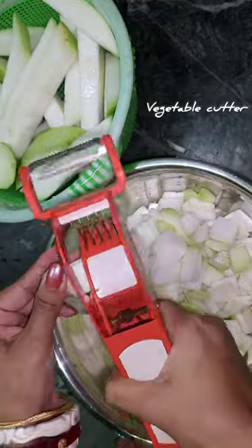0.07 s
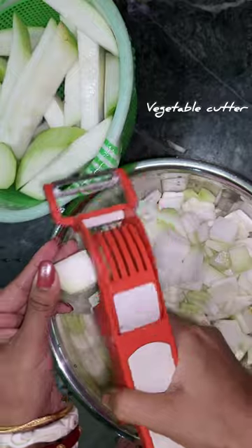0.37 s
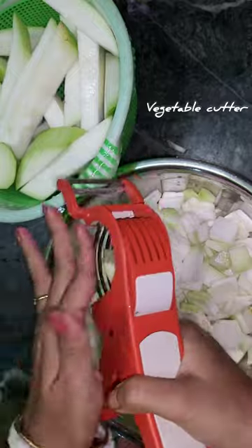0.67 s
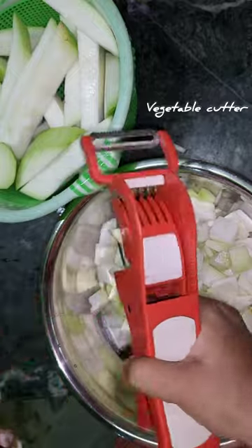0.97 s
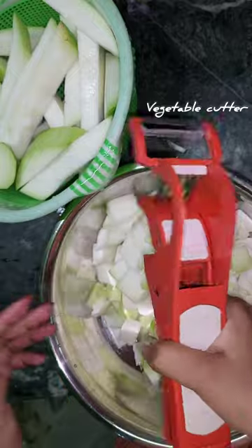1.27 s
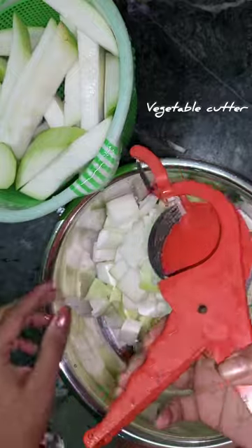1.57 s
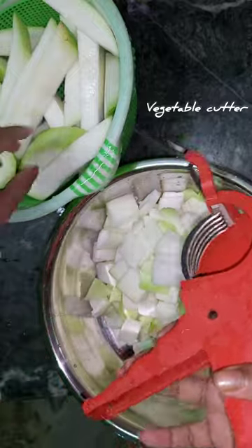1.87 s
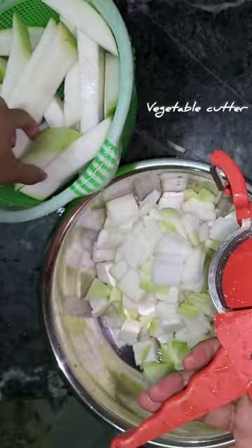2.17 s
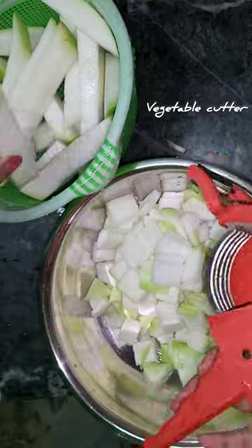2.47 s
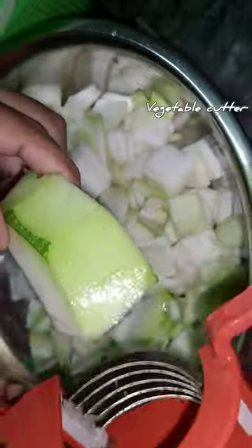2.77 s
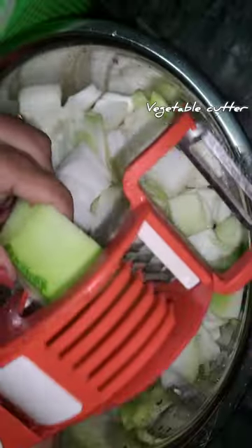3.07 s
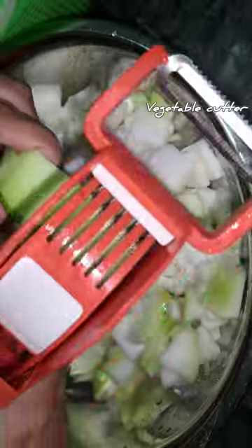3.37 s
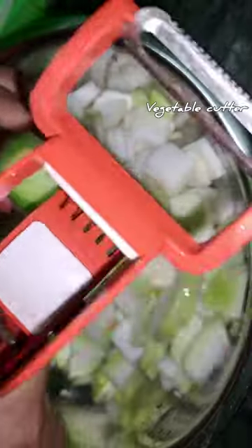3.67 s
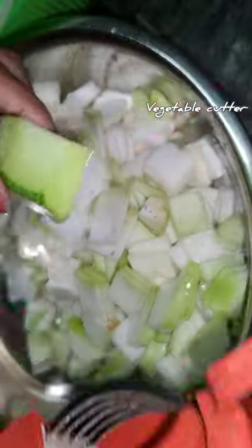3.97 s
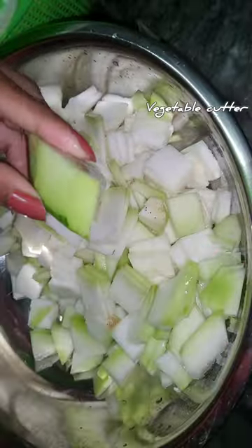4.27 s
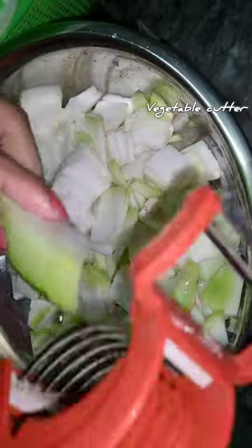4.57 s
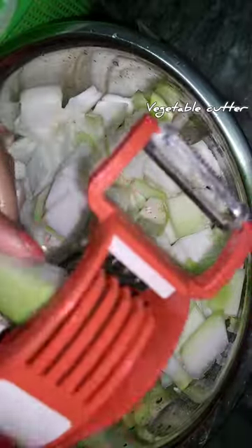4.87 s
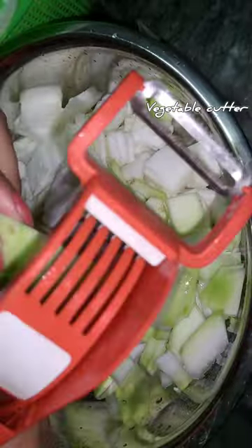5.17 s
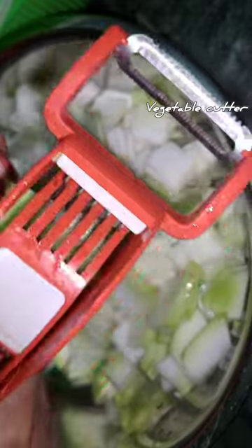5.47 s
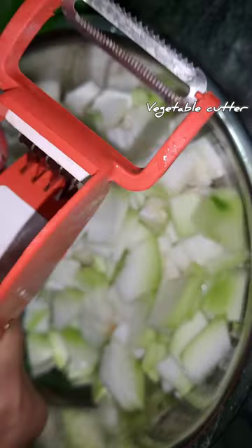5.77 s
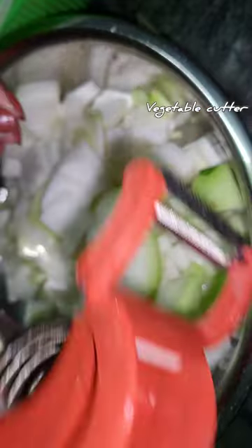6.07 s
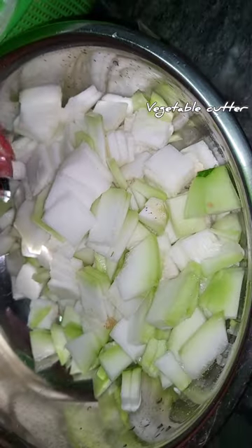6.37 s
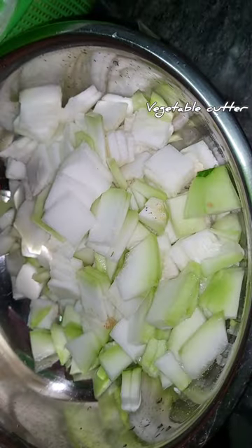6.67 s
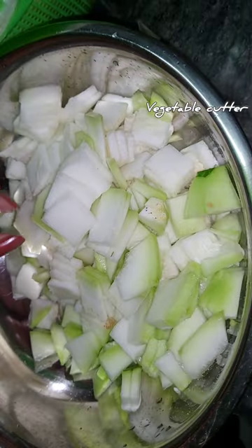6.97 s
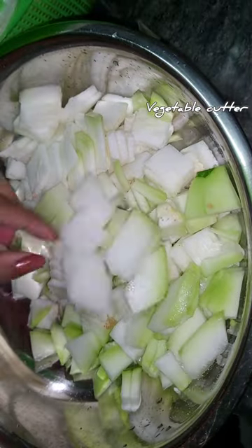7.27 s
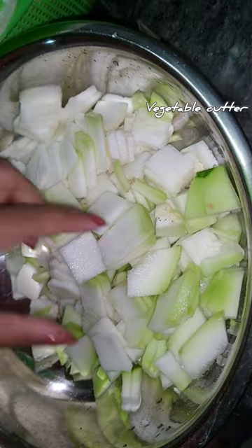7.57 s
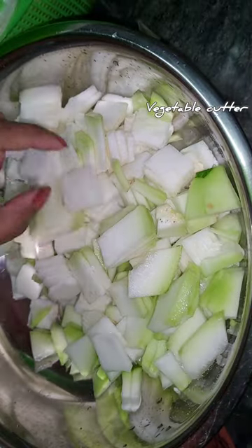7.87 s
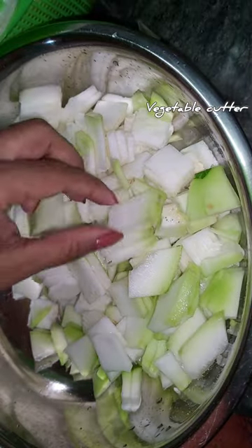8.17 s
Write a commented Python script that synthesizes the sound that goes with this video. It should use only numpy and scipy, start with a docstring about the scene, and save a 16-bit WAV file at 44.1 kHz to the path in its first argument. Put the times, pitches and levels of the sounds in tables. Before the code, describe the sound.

Four sharp plastic snaps of a hand chopper dicing gourd, each after a wet crunch, with bangles clinking between cuts.

```python
"""A sharp plastic snap opens the scene: a scissor-type chopper dices gourd over a steel bowl close by.
Four times the blades load the flesh, it tears in quickening slips, and the handles collide and rebound,
exciting the modes of shell and blades. Between cuts the frame ticks, the bowl is knocked, bangles clink
and fingers stir the pieces. The hard-walled kitchen reverberates, over a low rumble, a far engine
and, near the end, a thin whine."""
import sys
import numpy as np
from scipy import signal
from scipy.fft import rfft, irfft, next_fast_len
from scipy.io import wavfile
from scipy.ndimage import map_coordinates

SR = 44100
rng = np.random.default_rng(int(sys.argv[2]) if len(sys.argv) > 2 else 0)


def unload_wav(signal):
    """Save mono or channel-first audio to the path in sys.argv[1] as 16-bit WAV at rate SR, clipped to [-1, 1]."""
    wavfile.write(
        sys.argv[1],
        SR,
        np.round(np.clip(np.atleast_2d(signal).T, -1, 1) * 32767).astype(np.int16),
    )


N = 370881
TIME = np.arange(N) / SR
AGE = TIME[:SR]  # the first second after an impact

# One squeeze a row: snap t/s, squeeze length/s, pressing level/dB, snap level/dB, treble/dB, room/dB,
# thump level/dB, hollowness (0-1), first rebound delay/s, loss per rebound/dB, shell tuning (ratio),
# blade resonance f/Hz, its boost/dB, lead of the last slip/s, its level/dB
CUTS = [(0.038, .3, -42.5, 10.8, -2.5, -3.5, -21.5, 0.76, 0.0027, 13.4, 1.004, 2650, 3.1, 0.02, -36),
        (1.0521, 0.21, -50, 9.34, -3, 1.5, -12, 0.64, 0.021, 8.6, 1.0, 7800, 5, 0.018, -45.5),
        (3.5611, 0.51, -58, 12.7, 3.5, -1.5, -7, 1, .012, 4.5, .98, 1505, 2.5, .017, -27.5),
        (5.6626, 0.57, -59, 10.64, 2.5, 2.5, -4, 0.4, 0.016, 6.8, 0.95, 3750, 3, 0.019, -31.5)]


def amp(db):
    """Amplitude ratio of a level in decibels."""
    return 10 ** (np.asarray(db) / 20)


def unit(x):
    """Normalise to rms 1."""
    return x / np.sqrt(np.mean(x ** 2) + 1e-20)


def unit_energy(x):
    """Normalise to energy 1 in each channel."""
    return x / np.linalg.norm(x, axis=-1, keepdims=True)


def along(points, hz):
    """Interpolate (f/Hz, value) points on a logarithmic frequency axis."""
    f, values = np.transpose(points)
    return np.interp(np.log(hz + 1), np.log(f + 1), values)


def curve(points):
    """Interpolate (t/s, value) points at every sample."""
    return np.interp(TIME, *np.transpose(points))


def swells(rows):
    """Gaussian envelopes from (centre t/s, half length/s, level/dB) rows."""
    return sum(amp(db) * np.exp(-((TIME - s) / half) ** 2) for s, half, db in rows)


def fade(t, t60):
    """Exponential decay by 60 dB in t60 seconds."""
    return np.exp(-np.log(1000) * t / t60)


def blow(chatter_s, ring_db, ring_t60):
    """Impact envelope: a burst of contact, then the body's free decay."""
    return np.exp(-(AGE / chatter_s) ** 4) + amp(ring_db) * fade(AGE, ring_t60)


def wobble(rate):
    """Smooth random modulation, with rate knots a second."""
    return map_coordinates(rng.standard_normal(int(N * rate / SR) + 4), [TIME * rate])


def add(track, s, sound):
    """Superpose a sound on a track at s seconds."""
    start = max(round(s * SR), 0)
    track[..., start:start + sound.shape[-1]] += sound[..., :N - start]


def peak(hz, centre, width, db):
    """A resonance as a bell-shaped boost in dB."""
    return db / (1 + (2 * (hz - centre) / width) ** 2)


def narrow_band(hz, centre, half_width):
    """Band-pass response in dB, 6 dB down at half_width from the centre."""
    return -20 * np.log10(1 + ((hz - centre) / half_width) ** 2)


def bright(hz, treble_db, hinge_hz=3000):
    """Treble shelf in dB: a harder contact excites more high frequencies."""
    return treble_db * hz ** 4 / (hz ** 4 + hinge_hz ** 4)


def coloured(x, level):
    """Minimum-phase filter with the dB shape level(hz); white noise keeps its power."""
    size = 2 * next_fast_len(x.shape[-1] // 2 + 4096)
    magnitude = unit(amp(level(np.fft.rfftfreq(size, 1 / SR))))
    cepstrum = irfft(np.log(magnitude))
    cepstrum[1:size // 2] *= 2  # folding the cepstrum makes the filter causal
    cepstrum[size // 2 + 1:] = 0
    return irfft(rfft(x, size) * np.exp(rfft(cepstrum)))[..., :x.shape[-1]]


def noise_pair(correlation, size):
    """Partially coherent white noise in two channels."""
    mid, side = rng.standard_normal((2, size))
    angle = np.arccos(np.clip(correlation, -1, 1)) / 2
    return np.cos(angle) * mid + np.sin(angle) * np.array([side, -side])


def crackle(rate, grain_db):
    """Shot noise: tiny ruptures, rate a second on average, on a wet hiss."""
    grains = (rng.random(N) < rate / SR) * rng.standard_normal((2, N))
    return unit(noise_pair(0.11, N) + amp(grain_db) * unit(grains))


def ringing(modes, split=.0015, twin_db=-11):
    """Free vibration: damped (f/Hz, level/dB, t60/s) modes, each split into a beating pair."""
    out = np.zeros((2, SR))
    for hz, db, t60 in modes:
        phase = 2 * np.pi * hz * AGE
        offset = 2 * np.pi * rng.random((2, 2, 1))
        twins = np.sin(phase + offset[0]) + amp(twin_db) * np.sin(phase * (1 + split) + offset[1])
        decay = fade(AGE, t60)
        out += amp(db) * np.linalg.norm(decay) * unit_energy(twins * decay)
    return out


def scattered(modes, t60, scatter_db=3.0):
    """Modal excitation: every blow shares its energy among the modes differently."""
    return [(hz, db + scatter_db * rng.standard_normal(), t60) for hz, db in modes]


def kitchen(build_s=0.0016):
    """A diffuse impulse response: reflections build up, then the treble dies first."""
    # Reverberation time: f/Hz, t60/s
    decay_times = [(200, 0.96), (530, 0.49), (1390, 0.6), (7000, 0.48), (10000, 0.42)]
    hz, t, spectra = signal.stft(noise_pair(0.1, SR), SR, nperseg=256)
    decay = fade(t, along(decay_times, hz)[:, None])
    tail = signal.istft(spectra * decay, SR, nperseg=256)[1][:, :SR]
    return unit_energy(tail * (1 - np.exp(-(AGE / build_s) ** 2)))


def in_room(x, room_db):
    """Direct sound plus reverberation, by convolution with the kitchen's response."""
    return x + amp(room_db) * signal.fftconvolve(x, kitchen(), axes=1)[:, :x.shape[1]]


def room_noise(rumble_db=3, hum_db=-1.0, hum_hz=143, pan_db=-3):
    """Ambient noise: rumble and a narrow-band hum, a little to the right, under a faint hiss."""
    # Common envelope of rumble and hum: t/s, level/dB
    low_levels = [(0.0, -54.5), (0.47, -61), (1.22, -54), (1.57, -61), (2.2, -60), (2.56, -58),
                  (2.58, -66.5), (3.68, -57), (4.05, -66.5), (4.8, -64), (5.74, -55), (5.99, -64.5),
                  (6.44, -67.5), (7.82, -57.5), (8.41, -59.5)]
    # Rumble spectrum: f/Hz, level/dB
    rumble_spectrum = [(15, -48), (30, -22.5), (55, 0), (85, -10), (115, -5.5), (190, -10), (280, -6.5),
                       (480, -15), (840, -19.5), (1400, -27), (1900, -25.5), (2300, -38.5), (4000, -45.5),
                       (16000, -48.5)]
    # Stereo width of the rumble: f/Hz, relative side level/dB
    side_spectrum = [(60, -10), (130, -11.5), (300, -7.5), (1400, -0.5)]
    # Hiss envelope: t/s, level/dB
    hiss_levels = [(2.55, -72), (2.6, -77), (6.5, -79), (8.4, -72.5)]
    # Hiss spectrum: f/Hz, level/dB
    hiss_spectrum = [(2200, -23), (2850, 3), (3400, -16), (5300, -9), (6300, 2.5), (7300, 6), (8300, -16),
                     (16000, -18)]
    mid, side = rng.standard_normal((2, N))
    side = coloured(side, lambda hz: along(side_spectrum, hz))
    rumble = unit(coloured(np.array([mid + side, mid - side]), lambda hz: along(rumble_spectrum, hz)))
    hum = unit(coloured(rng.standard_normal(N), lambda hz: narrow_band(hz, hum_hz, half_width=6)))
    low = amp(curve(low_levels)) * (amp(rumble_db) * rumble + amp(hum_db) * hum)
    hiss_gain = amp(curve(hiss_levels) + 0.93 * wobble(2.3))
    hiss = hiss_gain * coloured(noise_pair(0.14, N), lambda hz: along(hiss_spectrum, hz))
    return amp([[pan_db / 2], [-pan_db / 2]]) * low + hiss


def whine(pitch_hz=1700.0, waver_hz=.38, octave_below_db=-11):
    """A thin electric tone with slight frequency modulation and a faint subharmonic."""
    # Whine envelope: t/s, level/dB
    levels = [(6.9, -71), (7.7, -63), (8.4, -61.5)]
    phase = 2 * np.pi * np.cumsum(pitch_hz + waver_hz * wobble(7.4)) / SR
    return amp(curve(levels)) * (np.sin(phase) + amp(octave_below_db) * np.sin(phase / 2))


def engine(idle_hz=58, pull_s=0.94, rise_hz_per_s=18, stop_s=2.57, db=-62, gain_db_per_s=2):
    """Engine orders follow shaft speed: a far engine idles, speeds up and grows louder; its sound ends abruptly
    at 2.57 s."""
    hz = idle_hz + rise_hz_per_s * np.maximum(TIME - pull_s, 0) + 0.32 * wobble(9.9)
    phase = 2 * np.pi * np.cumsum(hz) / SR
    orders = np.sin(phase) + amp(-7) * np.sin(1.5 * phase) + amp(-3) * np.sin(2 * phase)
    running = np.clip((stop_s - TIME) / 0.014, 0, 1)
    return amp(db + gain_db_per_s * TIME + 1.5 * wobble(8.2)) * running * orders


def handling():
    """Structure-borne noise: dull bumps as the chopper shifts in the grip."""
    # Changes of hold: centre t/s, half length/s, level/dB
    bumps = [(.75, 0.053, -61), (.97, .05, -53.5), (1.2, 0.074, -50.5), (2.47, 0.071, -59)]
    # Bump spectrum: f/Hz, level/dB
    spectrum = [(25, -10), (65, 3), (120, 1.5), (180, -8), (280, -5), (2000, -50.5)]
    return swells(bumps) * coloured(noise_pair(0.88, N), lambda hz: along(spectrum, hz))


def stirring():
    """Sliding friction: fingers push the wet pieces over each other."""
    # Finger strokes: centre t/s, half length/s, level/dB
    strokes = [(7.03, 0.093, -70.5), (7.389, 0.13, -62.5), (7.63, 0.11, -56)]
    # Spectrum of the sliding pieces: f/Hz, level/dB
    spectrum = [(500, -1), (1100, 1), (2400, -5.5), (5000, -1.5), (10000, -7.5)]
    return swells(strokes) * coloured(crackle(rate=1600, grain_db=-6.5), lambda hz: along(spectrum, hz))


def struck_ring(ring_db, hardness, place, damping, lowest_order=5, node_db=-15, pivot_hz=8800.0):
    """Modes struck near a node stay weak; hard contact favours high ones, and the arm damps them all."""
    # Bending modes of a bangle, fifth order up: f/Hz, level/dB, t60/s
    modes = [(4410, -15.5, 0.97), (6590, -9.5, 0.71), (9080, -4.5, 0.71), (11750, 0, 0.52),
             (14618, -2.5, .4)]
    hz, db, t60 = np.transpose(modes)
    orders = lowest_order + np.arange(len(hz))
    swing = np.hypot(np.cos(orders * np.radians(place)), amp(node_db))
    levels = ring_db + db + 20 * np.log10(swing) + hardness * np.log2(hz / pivot_hz)
    damped_t60 = 60 / (60 / t60 + abs(damping))  # decay rates add
    return list(zip(hz, levels, damped_t60))


def rattling(count=4, gap_s=.008, loss_db=3.5, ring_db=-33, damping_db_per_s=160):
    """Inelastic bounces: uneven, weakening touches at random places round a bangle."""
    # Rattle onsets: t/s, contact level/dB
    rattles = [(.872, -25), (1.9021, -10), (1.932, -13.5), (7.721, -16), (7.75, -22)]
    bounces = [(s + gap_s * k * (.5 + rng.random()), db - k * loss_db)
               for s, db in rattles for k in range(count)]
    return [(s, db, db + ring_db, 0, 180 * rng.random(), damping_db_per_s) for s, db in bounces]


def bangles(jingle_db=-38, jingle_t60=.17, tick_t60=0.01415, room_db=-7):
    """Impact and free vibration: a bright tick, then the struck ring and its neighbours ring on."""
    # Touches: t/s, contact level/dB, ring level/dB, hardness/(dB/octave), place/degrees, damping/(dB/s)
    clinks = [(0.146, -16, -55, 1, 47, 13), (0.704, -13.5, -36, 4.5, 70.5, 19),
              (0.775, -15, -41, 4, 13.4, 0), (1.449, -20, -55, -5, 68, 30), (1.887, -4, -30.5, 4.5, 84, 81),
              (2.315, -31.5, -69, 3, 29, 0), (3.1385, -13.5, -43, 2, 60, 11), (4.385, -22, -58, -5, 41, 13),
              (5.6129, -4.5, -31, -1, 86, 40), (5.994, -10, -42, 1.5, 29.6, 25.5),
              (6.730, -29.5, -56.5, 6, 81, 42.5), (7.189, -18, -49, 2.5, 79, 72),
              (7.697, -4.5, -34.5, -1, 62, 94), (7.733, -15, -40, 4, 73, 162),
              (8.165, -19.5, -50.5, 4.5, 28.5, 100.5)]
    # Modes of the other rings in the stack: f/Hz, level/dB
    neighbours = [(3030, -20), (3203, -19.5), (4520, -12), (5125, -12), (12450, -1.5)]
    # Spectrum of ring on ring: f/Hz, level/dB
    spectrum = [(1000, -41.5), (3000, -15), (3700, -17), (4500, -5), (5800, -12.5), (8550, -5.5),
                (9800, -9.5), (11300, -8), (12300, 3.5), (13600, -7.5)]
    out = np.zeros((2, N))
    for s, contact_db, ring_db, hardness, place, damping in list(clinks) + rattling():
        tick = unit_energy(noise_pair(0.046, SR) * fade(AGE, tick_t60)) + amp(room_db) * kitchen()
        tick = amp(contact_db) * coloured(tick, lambda hz: along(spectrum, hz))
        ring = ringing(struck_ring(ring_db, hardness, place, damping), split=.002)
        jingle = amp(contact_db + jingle_db) * ringing(scattered(neighbours, jingle_t60))
        add(out, s, tick + in_room(ring + jingle, room_db))
    return out


def bowl(s=2.967, knock_db=-10, knock_room_db=-1.0):
    """Damped shell modes: the chopper bumps the rim of the loaded steel bowl, which rings briefly."""
    # Bowl modes: f/Hz, level/dB, t60/s
    modes = [(880, -58, .5), (1370, -43, 0.44), (1810, -44.5, .28), (5766, -57.5, .5), (6589, -51, .18),
             (6960, -48, 0.2)]
    # Spectrum of plastic on the rim: f/Hz, level/dB
    spectrum = [(100, -0.5), (800, -10), (1500, -0.5), (5200, -14.5), (6800, -3), (9000, -22),
                (16000, -25.5)]
    contact = blow(chatter_s=0.0055, ring_db=-2.5, ring_t60=0.14)
    knock = unit_energy(noise_pair(0.49, SR) * contact) + amp(knock_room_db) * kitchen()
    knock = amp(knock_db) * coloured(knock, lambda hz: along(spectrum, hz))
    out = np.zeros((2, N))
    add(out, s, knock + in_room(ringing(modes), room_db=-7))
    return out


def ticks(width_hz=400, resonance_db=10.0, room_db=-7):
    """Light impacts excite the plastic frame as it opens, takes a new piece and flexes."""
    # Knocks of the frame: t/s, energy level/dB, treble/dB, resonance f/Hz
    knocks = [(0.327, -11, 2.5, 2400), (0.575, -27, -19, 3120), (0.656, -34.5, 15.5, 6500),
              (0.67, -32.5, 12, 4300), (0.909, -21.5, 6.5, 3076), (0.954, -15, 6, 3090),
              (1.372, -11.5, 1.5, 2430), (1.521, -29, -1, 3100), (1.830, -30, 23, 4530),
              (2.234, -41, 18, 4480), (3.034, -26, 10.5, 5708), (3.206, -17.5, 3.5, 1900),
              (3.409, -16, 4, 4794), (3.431, -18, 4, 3000), (4.062, -18, -0.5, 2110), (5.151, -19, 3, 1990),
              (6.200, -17.5, 1.5, 1700)]
    # Spectrum of the open frame: f/Hz, level/dB
    spectrum = [(100, -18.5), (500, -9.5), (1200, -11), (1650, -8.5), (2300, -5.5), (4300, -10),
                (11000, -15), (16000, -27)]
    contact = blow(chatter_s=0.0035, ring_db=-6, ring_t60=0.1)
    out = np.zeros((2, N))
    for s, db, treble_db, pitch_hz in knocks:
        knock = unit_energy(noise_pair(0.077, SR) * contact) + amp(room_db) * kitchen()
        body = lambda hz: along(spectrum, hz) + peak(hz, pitch_hz, width_hz, resonance_db)
        add(out, s, amp(db) * coloured(knock, lambda hz: body(hz) + bright(hz, treble_db)))
    return out


def squeal(pitch_hz=2390, half_width_hz=70):
    """Friction noise in a narrow band: in the slowest cut the wet flesh drags on the blades."""
    # Drag on the blades: centre t/s, half length/s, level/dB
    drag = [(5.48, 0.14, -65.5)]
    return swells(drag) * coloured(noise_pair(.3, N), lambda hz: narrow_band(hz, pitch_hz, half_width_hz))


def pressure(bite_s=0.15, strain_db=8, strain_s=0.015, release_s=0.009):
    """Loading to fracture: blade force builds, holds, peaks and lets go just before each snap."""
    force = np.zeros(N)
    for s, length, db, *_ in CUTS:
        bite = np.clip((TIME - s + length) / bite_s, 0, 1)
        strain = amp(strain_db * np.exp(-np.abs(TIME - s) / strain_s))
        release = np.clip((s - TIME) / release_s, 0, 1) ** 2
        force += amp(db) * bite * strain * release
    return force


def tearing(count=2, spread=1.6, step_db=8, length_s=0.019, rasp_hz=3820, width_hz=12000):
    """Stick-slip: the last flesh gives way in slips that grow and crowd towards the snap."""
    slips = [(s - lead * spread ** k, length_s, db - k * step_db, rasp_hz, width_hz)
             for s, *_, lead, db in CUTS for k in range(count)]
    return [slip for slip in slips if slip[0] > 0]


def slicing(squeak_db=10, uneven_db=1.5, clump_db=3):
    """Fracture and friction: cells burst under load, and slipping flesh rasps on the steel."""
    # The flesh catches and slips: t/s, length/s, level/dB, squeak f/Hz, its width/Hz
    rasps = [(.255, 0.023, -45.5, 7100, 900), (0.979, 0.025, -33, 2610, 702),
             (1.004, 0.048, -36, 5295, 1500), (3.234, 0.019, -45.5, 3295, 1500),
             (3.396, 0.039, -44.5, 3856, 2600), (3.502, 0.031, -41, 1700, 500),
             (5.04, 0.044, -65, 3000, 600), (5.282, 0.031, -45, 2390, 400),
             (5.319, 0.019, -47.5, 3433, 3000), (5.412, 0.026, -50.5, 5130, 1200)]
    # Spectrum of rupturing flesh: f/Hz, level/dB
    flesh = [(300, -17.5), (1000, -10), (1700, 0), (2500, -1.5), (4000, -3), (7000, -2.5), (9000, -8),
             (13000, -4.5), (16000, -12.5)]
    crunch = pressure() * amp(uneven_db * wobble(40)) * crackle(rate=410, grain_db=-3.0)
    out = coloured(crunch, lambda hz: along(flesh, hz))
    cells = unit(amp(clump_db * wobble(160)) * crackle(rate=1800, grain_db=0.0))
    for s, length, db, squeak_hz, width_hz in list(rasps) + tearing():
        arch = np.sqrt(np.abs(np.sin(np.pi * AGE / length))) * (AGE < length)
        start = round(s * SR)
        slip = arch * cells[:, start:start + SR]
        rasp = coloured(slip, lambda hz: along(flesh, hz) + peak(hz, squeak_hz, width_hz, squeak_db))
        add(out, s, amp(db) * rasp)
    return in_room(out, room_db=-6.0)


def shell(hz, hollow):
    """Frequency response of the closed plastic body in dB; flesh inside damps its resonances."""
    # Broad response of the shell: f/Hz, level/dB
    spectrum = [(60, -26), (300, -25.5), (480, -9), (650, -19.5), (850, -8.5), (1450, -5.5), (2600, -4),
                (3150, -10), (7500, -10), (9500, -14), (13000, -11.5), (16000, -20.5)]
    # Shell resonances: f/Hz, width/Hz, boost/dB
    modes = [(1277, 70, 7.5), (1450, 300, 12), (1768, 49, 10), (2445, 72, 8.5), (3900, 560, 6),
             (4520, 540, 4), (5040, 120, 2.5)]
    return along(spectrum, hz) + np.clip(hollow, 0, 1) * sum(peak(hz, *mode) for mode in modes)


def snaps(steel_db=-8.5, steel_t60=.38, thump_t60=0.76, blade_width_hz=330, shrink=.87, dull_db=2):
    """Inelastic collision: the chopper shuts, rings and rebounds, each time sooner, weaker and duller."""
    # Modes of the steel blades: f/Hz, level/dB
    blades = [(1317, -1), (1466, 0), (1573, -3), (1784, -1), (2411, -4.5), (2455, -4.5), (3673, -6),
              (4426, -9)]
    # Spectrum of the jolt through the hand: f/Hz, level/dB
    jolt_spectrum = [(20, -7.5), (60, -4), (135, 1), (195, -15.5), (265, 3.5), (340, -17.5), (2000, -54.5)]
    contact = blow(chatter_s=0.0042, ring_db=-12, ring_t60=0.19)
    out = np.zeros((2, N))
    for (s, _, _, db, treble_db, room_db, thump_db, hollow,
         flight_s, loss_db, tuning, blade_hz, blade_db, *_) in CUTS:
        body = lambda hz: shell(hz / tuning, hollow) + peak(hz, blade_hz, blade_width_hz, blade_db)
        steel = unit_energy(ringing(scattered(blades, steel_t60)))
        add(out, s, amp(db + steel_db) * hollow * steel)
        for k in range(3):  # the snap and two rebounds
            crack = unit_energy(noise_pair(0.27, SR) * contact) + amp(room_db) * kitchen()
            crack = coloured(crack, lambda hz: body(hz) + bright(hz, treble_db - k * dull_db))
            jolt = noise_pair(0.75, SR) * fade(AGE, thump_t60)
            thump = unit_energy(coloured(jolt, lambda hz: along(jolt_spectrum, hz)))
            add(out, s, amp(-k * loss_db) * (amp(db) * crack + amp(thump_db) * thump))
            s += flight_s * shrink ** k
    return out


def scene():
    """Superposition of all sources in stereo; once, the level dips for an instant."""
    chopper = snaps() + slicing() + squeal() + ticks() + bowl()
    hands = bangles() + stirring() + handling()
    dip = np.where((TIME > 2.564) & (TIME < 2.576), amp(-25), 1)
    return dip * (chopper + hands + room_noise() + whine() + engine())


def record(dry):
    """Hard clipping at full scale, then a steep low-pass band limit."""
    top_hz, edge_hz = 15900, 300
    size = next_fast_len(N + 8192)
    passband = np.clip((top_hz - np.fft.rfftfreq(size, 1 / SR)) / edge_hz + .5, 0, 1)
    clipped = np.clip(dry, -1, 1)
    return irfft(rfft(clipped, size) * passband, size)[:, :N]


dry = scene()
out = record(dry)
unload_wav(out)
```